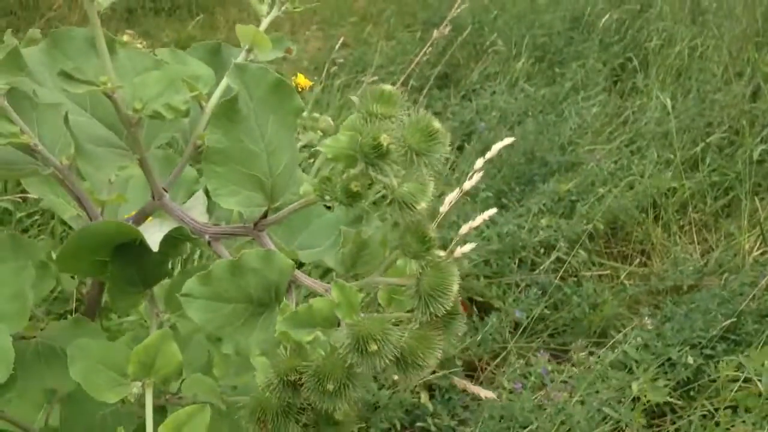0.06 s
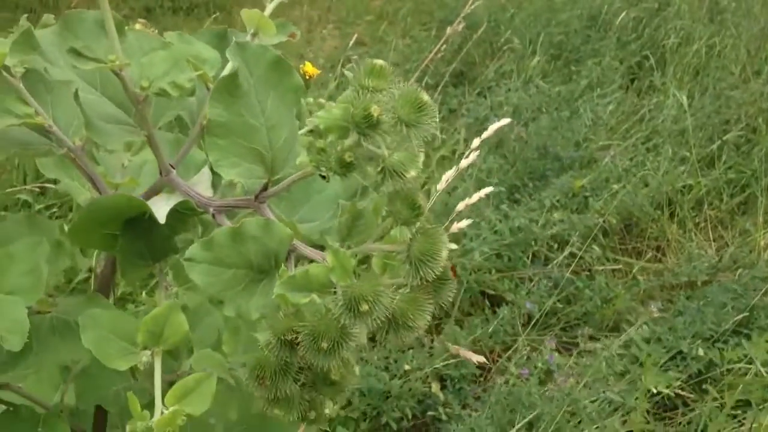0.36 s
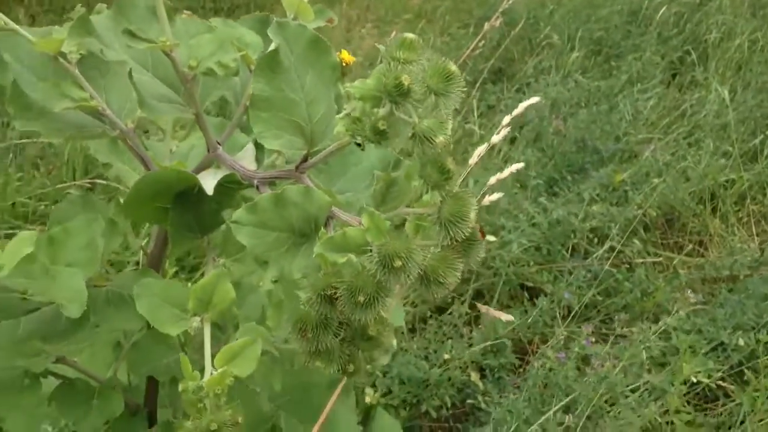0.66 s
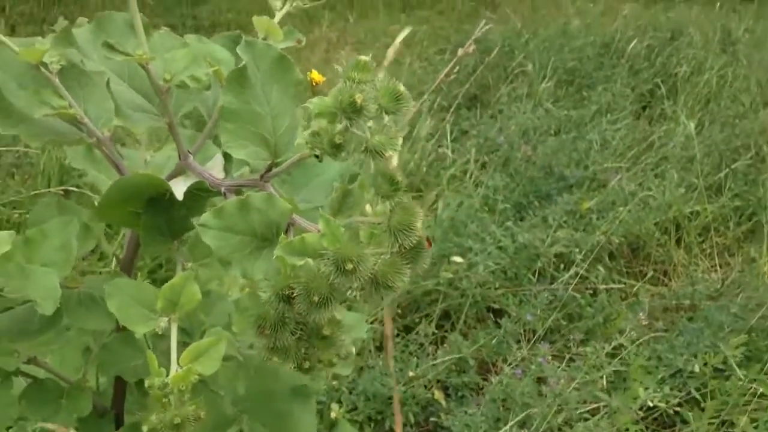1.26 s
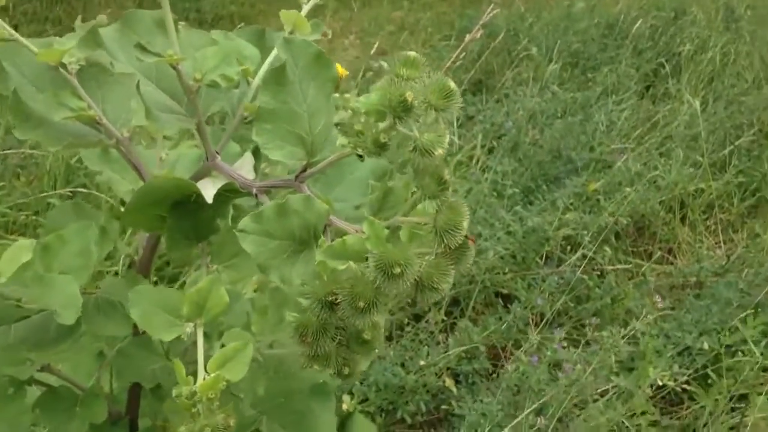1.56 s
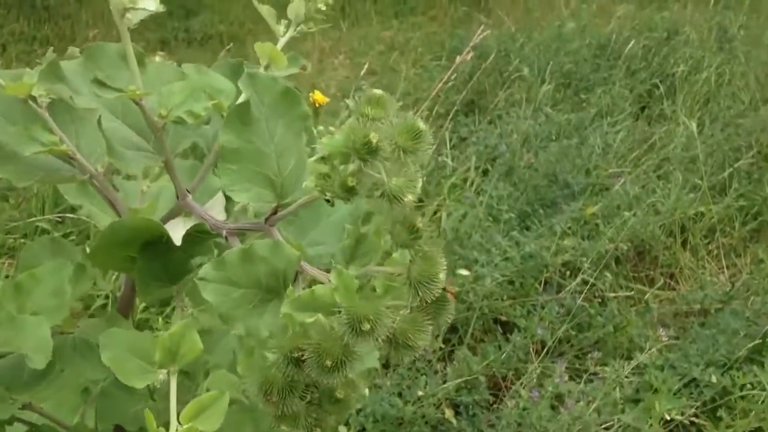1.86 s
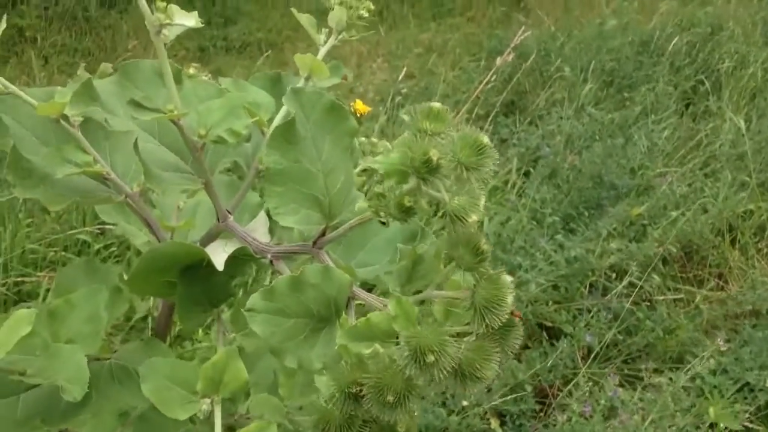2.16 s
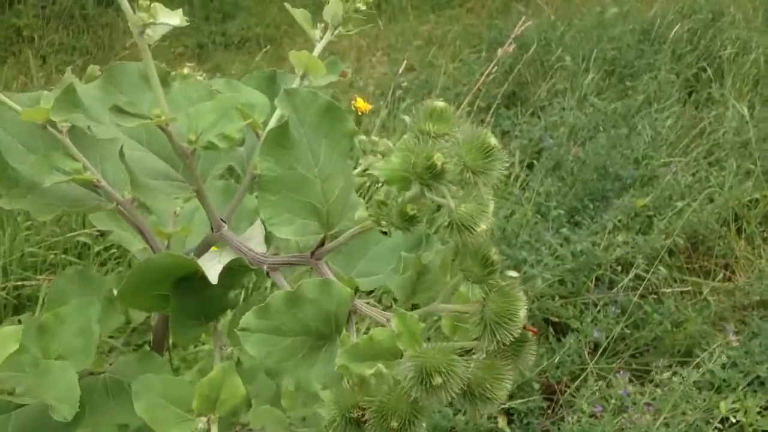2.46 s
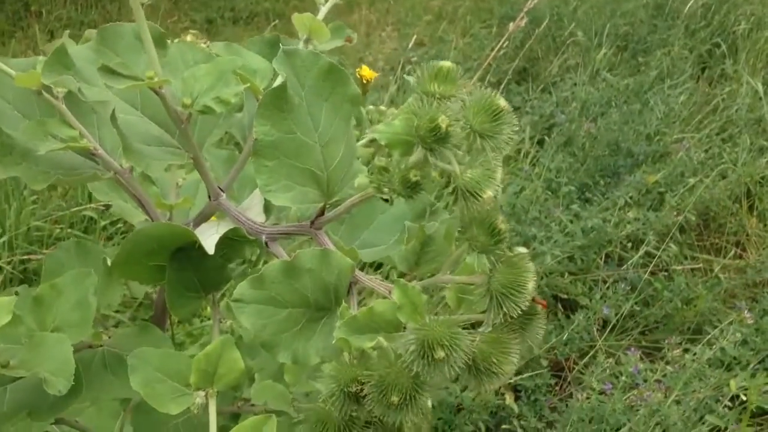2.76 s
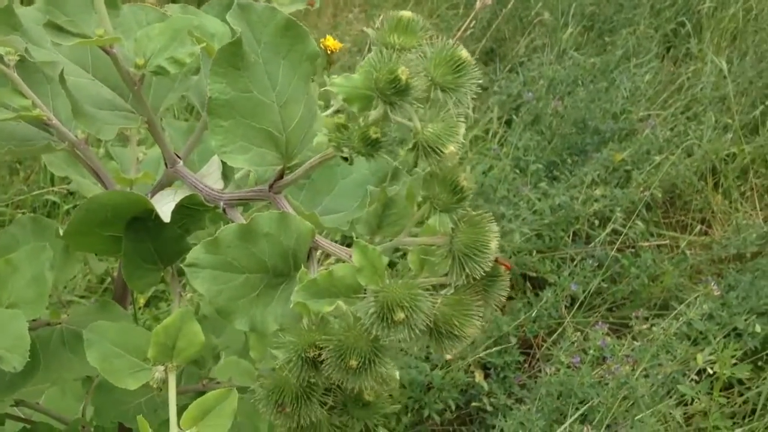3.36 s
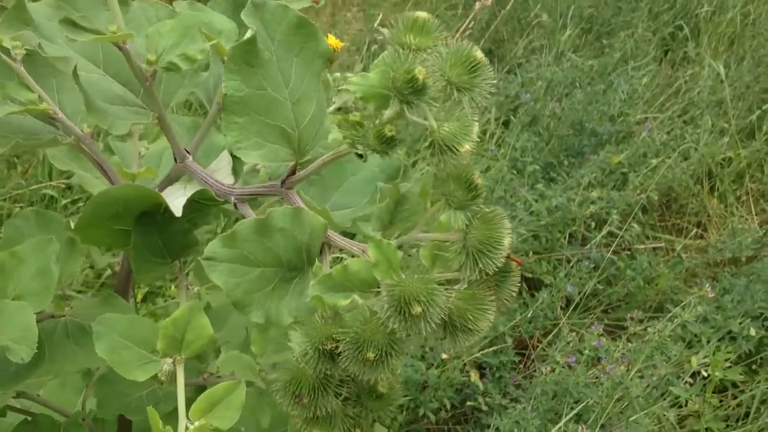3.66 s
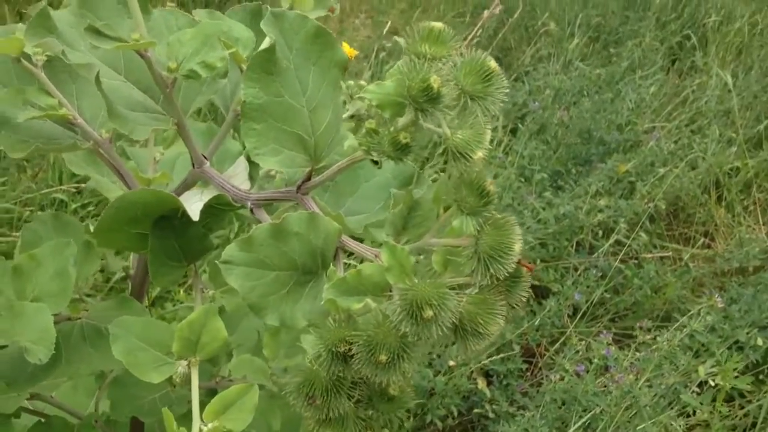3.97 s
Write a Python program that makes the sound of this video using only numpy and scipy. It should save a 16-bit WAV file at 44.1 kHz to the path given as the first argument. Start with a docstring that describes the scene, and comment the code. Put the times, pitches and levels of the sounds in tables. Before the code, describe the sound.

Large leaves and weeds rustle close to the microphone in three uneven swells, with light stalk knocks and ticks, then settle. Behind them in the meadow are a steady, very high cricket buzz and a faint low rumble.

```python
"""Leaves brushing in a meadow.

Large leaves and weeds rub close to a mono microphone in three uneven swells of stick-slip hiss.
Stalks knock and tick as they move. Behind them: a steady, very high buzz of bush-cricket wing
strokes, faint grasshopper rasps, a low rumble and a distant drone."""
import sys
import numpy as np
from scipy import signal
from scipy.fft import rfft, irfft
from scipy.io import wavfile
from scipy.ndimage import uniform_filter1d

SR = 44100
rng = np.random.default_rng(int(sys.argv[2]) if len(sys.argv) > 2 else 0)


def master(y):
    """Save y as 16-bit WAV."""
    cut = np.clip(np.atleast_2d(y).T, -1, 1)
    pcm = np.round(cut * 32767)  # scale
    wavfile.write(sys.argv[1], SR, pcm.astype(np.int16))


N = 176400

# distant rumble and air spectrum: f/Hz, level/dB
AIR_SPECTRUM = [(20, -37), (50, -36), (70, -21.5), (105, -16.5), (135, -4), (170, 1.5), (215, -0.5),
                (255, -7), (320, -7.5), (400, -13.5), (600, -15.5), (1000, -18.5), (2000, -26),
                (3000, -25.5), (4300, -24), (8000, -28), (16000, -22.5)]
# drone spectrum: f/Hz, level/dB
DRONE_SPECTRUM = [(100, -41), (230, -11.5), (295, 4.5), (345, 0.5), (420, -11.5), (900, -36)]
# drone envelope: t/s, level/dB
DRONE_ENVELOPE = [(0, -67.5), (.6, -69), (1.0, -79.5), (3.2, -76), (3.65, -70.5), (4, -73)]
# bush-crickets: stroke rate/Hz, level/dB, carrier/Hz
CRICKETS = [(81.6, -54.5, 14550), (70.2, -63, 15600), (77.9, -69.5, 14500)]
# far insect hiss: f/Hz, level/dB
CHORUS_SPECTRUM = [(3000, -56), (6000, -20), (8000, -16), (9800, -21.5), (11000, -14.5), (12300, -8),
                   (14000, -5), (15200, 4), (16000, -9.5)]
# grasshopper spectrum: f/Hz, level/dB
CHIRP_SPECTRUM = [(3000, -41), (5500, -15.5), (6800, -5), (8500, -5.5), (10000, -7.5), (14000, -12)]
# grasshopper envelope: t/s, level/dB
CHIRP_ENVELOPE = [(0, -67.5), (.26, -66), (.34, -67), (2.5, -70), (4, -69)]
# leaf rubbing: t/s, level/dB
RUB_ENVELOPE = [(0, -76), (.3, -69), (.5, -62), (.66, -62.5), (.72, -52), (.8, -46), (.9, -50), (1.0, -54),
                (1.1, -60), (1.19, -58.5), (1.3, -52.5), (1.42, -44), (1.52, -39.5), (1.58, -40.5),
                (1.63, -40.5), (1.7, -40.5), (1.78, -46.5), (1.86, -54.5), (1.94, -49), (2.1, -47.5),
                (2.22, -53), (2.34, -59), (2.5, -63.5), (3.0, -69), (3.25, -67), (3.5, -87), (4, -95)]
# leaf on leaf, light pressure: f/Hz, level/dB
LIGHT_SPECTRUM = [(300, -58), (1800, -18.5), (2400, -8), (3000, -14.5), (3450, -5.5), (4000, 0.5),
                  (4700, 0.5), (5500, -5), (6300, -3), (7200, 0), (8300, 2), (9700, -4.5), (11300, -3.5),
                  (13500, 1.5), (15500, -24)]
# leaf on leaf, hard pressure: f/Hz, level/dB
HARD_SPECTRUM = [(300, -35), (1800, -11), (2400, -23), (2850, -18.5), (3300, -7.5), (3900, -4),
                 (4500, -2.5), (5500, -9.5), (6500, -4.5), (7600, 1.5), (8400, 1), (9700, -7),
                 (11300, -8.5), (13500, 0), (15500, -10.5)]
# dull scrape under the hiss: t/s, level/dB
SCRAPE_ENVELOPE = [(0, -77.5), (.5, -71.5), (.67, -69), (.77, -58), (.88, -56.5), (.97, -63.5), (1.1, -69),
                   (1.28, -65.5), (1.5, -55), (1.68, -51.5), (1.86, -62.5), (1.94, -58.5), (2.12, -58),
                   (2.3, -69), (2.6, -73.5), (3.25, -74), (3.6, -83), (4, -92)]
# leaf body response: f/Hz, level/dB
BODY_SPECTRUM = [(60, -36), (150, -14.5), (300, -7), (500, -3), (800, -2), (1250, -1), (1700, -0.5),
                 (2250, -2), (2850, -15.5), (4000, -11), (9000, -50)]
# stalk knocks: t/s, level/dB, f/Hz, T60/s
KNOCKS = [(.884, -56, 890, .015), (.911, -45.5, 1050, 0.053), (1.081, -50.5, 2060, .015),
          (1.195, -52, 1260, 0.027), (1.357, -48, 1090, 0.028), (1.651, -45, 1440, 0.022),
          (1.663, -37.5, 1240, 0.03), (2.250, -37.5, 800, 0.011), (2.452, -49.5, 600, .014),
          (3.210, -43, 1990, 0.011)]
# dry stem ticks: t/s, level/dB, crumble decay/s, tilt/(dB/octave)
TICKS = [(1.4115, -33, 0.0015, -7), (1.652, -26, 0.0034, -2), (1.664, -23, 0.0018, 0),
         (2.1015, -32, .002, 4), (2.197, -32, .001, 4), (2.4526, -35, 0.0025, -3),
         (3.1447, -23.5, 0.00055, 2), (3.210, -32, 0.00083, -1)]
# tick spectrum: f/Hz, level/dB
TICK_SPECTRUM = [(300, -30), (1000, -23), (2000, -5), (2950, -13), (4200, 7.5), (5700, -1), (8200, 8),
                 (10500, 1.5), (13300, 14), (15000, -27), (16000, -35)]


def amp(db):
    """dB to gain."""
    return 10 ** (np.asarray(db) / 20)


def unit(x):
    """Scale to rms 1."""
    return x / np.sqrt(np.mean(x ** 2) + 1e-20)


def curve(points):
    """Breakpoints interpolated per sample."""
    return np.interp(np.arange(N) / SR, *np.transpose(points))


def colour(x, spectrum, tilt_db_per_oct=0):
    """Filter by spectrum and tilt; rms 1."""
    octave = np.log2(np.fft.rfftfreq(len(x), 1 / SR) + 1)
    f_hz, level_db = np.transpose(spectrum)
    shape_db = np.interp(octave, np.log2(f_hz), level_db)
    tilt_db = tilt_db_per_oct * np.maximum(octave, np.log2(f_hz[0]))
    return unit(irfft(rfft(x) * amp(shape_db + tilt_db), len(x)))


def drift(rate_hz):
    """Low-passed random wander; rms 1."""
    f_hz = np.fft.rfftfreq(N, 1 / SR)
    return unit(irfft(rfft(rng.standard_normal(N)) / (1 + (f_hz / rate_hz) ** 2) ** 2, N))


def add(mix, start_s, sound):
    """Mix in at start_s."""
    part = mix[max(round(start_s * SR), 0):][:len(sound)]
    part += sound[:len(part)]


def slips(per_s, spread_db):
    """Stick-slip impulses of random size and sign; rms 1."""
    size = amp(spread_db * np.minimum(rng.exponential(1, N), 4))
    return unit(size * rng.choice([-1., 1.], N) * (rng.random(N) < per_s / SR))


def patchy(x, depth_db):
    """Shifting contact points: spectral patches come and go."""
    bins = signal.stft(x, nperseg=512)[2]
    patches = uniform_filter1d(rng.standard_normal(bins.shape), size=8, axis=0)
    patches = unit(uniform_filter1d(patches, size=10, axis=1))
    return unit(signal.istft(bins * amp(depth_db * patches), nperseg=512)[1][:N])


def air(rumble_db=-63):
    """Steady low rumble with a faint wash; a slightly higher drone fades and returns."""
    rumble = amp(rumble_db + .5 * drift(rate_hz=3.5)) * colour(rng.standard_normal(N), AIR_SPECTRUM)
    drone = amp(curve(DRONE_ENVELOPE)) * colour(rng.standard_normal(N), DRONE_SPECTRUM)
    return rumble + drone


def crickets(stroke_sigma_cycles=0.091, backstroke_db=-4.5, half_width_hz=1500):
    """Each wing stroke scrapes a short, very high burst; the backstroke a weaker one."""
    out, f_hz = np.zeros(N), np.fft.rfftfreq(N, 1 / SR)
    for rate_hz, level_db, carrier_hz in CRICKETS:
        cycles = np.cumsum(rate_hz * (1 + 0.0061 * drift(rate_hz=3.3))) / SR + rng.random()
        stroke = np.exp(-.5 * ((cycles % 1 - .25) / stroke_sigma_cycles) ** 2)
        back = amp(backstroke_db) * np.exp(-.5 * ((cycles % 1 - .53) / stroke_sigma_cycles) ** 2)
        resonance = 1 / (1 + ((f_hz - carrier_hz) / half_width_hz) ** 2)
        wing = unit(irfft(rfft(rng.standard_normal(N)) * resonance, N))
        flicker_db = drift(rate_hz=60) + drift(rate_hz=2)
        out += amp(level_db) * unit(wing * (stroke + back) * amp(flicker_db))
    return out


def insect_chorus(level_db=-52.5):
    """Far insects merged into a hiss."""
    return amp(level_db) * colour(slips(per_s=9000, spread_db=1.0), CHORUS_SPECTRUM)


def grasshopper(chirp_hz=5.6, first_chirp_s=.055):
    """Soft, evenly repeated rasps further off."""
    cycles = np.cumsum(chirp_hz * (1 + 0.052 * drift(rate_hz=3.3))) / SR - chirp_hz * first_chirp_s
    pulses = 0.18 + np.cos(np.pi * cycles) ** 2
    rasp = colour(slips(per_s=3400, spread_db=6.0), CHIRP_SPECTRUM)
    return amp(curve(CHIRP_ENVELOPE)) * unit(rasp * pulses)


def leaves(light_db=-46.5, hard_db=-39):
    """Dense slips hiss, coloured by pressure; coarser slips shake the leaf bodies."""
    rub_db = curve(RUB_ENVELOPE)
    press = np.clip((rub_db - light_db) / (hard_db - light_db), 0, 1)
    fine = patchy(slips(per_s=16000, spread_db=2.5), depth_db=1.3)
    hiss = (1 - press) * colour(fine, LIGHT_SPECTRUM) + press * colour(fine, HARD_SPECTRUM)
    coarse = patchy(slips(per_s=4000, spread_db=2.0), depth_db=1.0)
    scrape = amp(curve(SCRAPE_ENVELOPE)) * colour(coarse, BODY_SPECTRUM)
    flicker_db = 0.77 * drift(rate_hz=55)
    return (amp(rub_db) * hiss + scrape) * amp(flicker_db)


def stalks(crumble_gain=0.25, lead_samples=64, low_cut_hz=375):
    """Knock: brief ring plus woody thud. Tick: one fracture plus crumble. Little bass radiates."""
    out, t_s = np.zeros(N), np.arange(SR // 10) / SR
    for start_s, level_db, f_hz, t60_s in KNOCKS:
        ring = 0.8 * np.sin(2 * np.pi * f_hz * t_s)
        thud = 0.33 * colour(rng.standard_normal(len(t_s)), BODY_SPECTRUM)
        add(out, start_s, amp(level_db - 60 * t_s / t60_s) * (ring + thud))
    for start_s, level_db, decay_s, tilt_db_per_oct in TICKS:
        fracture = t_s == 0
        crumble = crumble_gain * rng.choice([-1., 1.], len(t_s)) * np.exp(-t_s / decay_s)
        burst = np.roll(fracture + crumble, lead_samples)  # room for filter pre-ring
        tick = colour(burst, TICK_SPECTRUM, tilt_db_per_oct) / np.sqrt(len(t_s))
        add(out, start_s - lead_samples / SR, 1.87 * amp(level_db) * tick)
    return signal.sosfilt(signal.butter(3, low_cut_hz, "highpass", fs=SR, output="sos"), out)


def scene():
    """Mono sum on both channels."""
    mono = air() + crickets() + insect_chorus() + grasshopper() + leaves() + stalks()
    return np.tile(mono, (2, 1))


def record(dry):
    """Recorder band limit."""
    edge_hz = 15380
    lowpass = signal.firwin(701, edge_hz, window=("kaiser", 8), fs=SR)
    return signal.oaconvolve(dry, lowpass[None], "same")


dry = scene()
out = record(dry)
master(out)
```